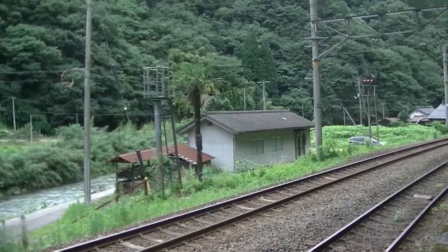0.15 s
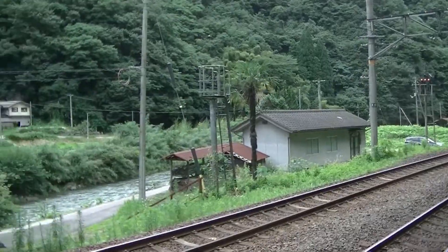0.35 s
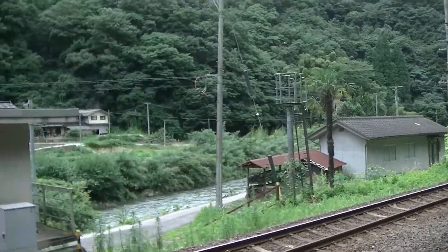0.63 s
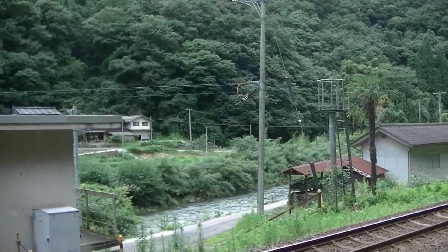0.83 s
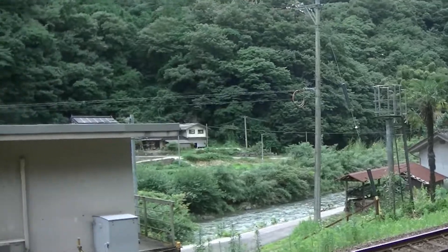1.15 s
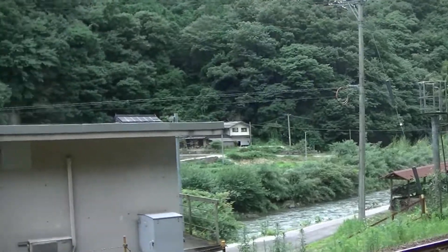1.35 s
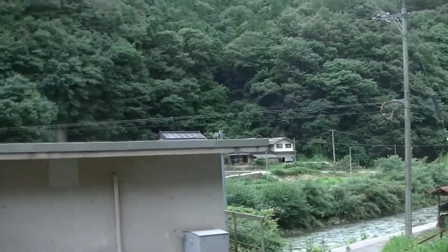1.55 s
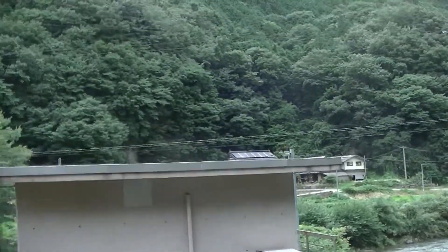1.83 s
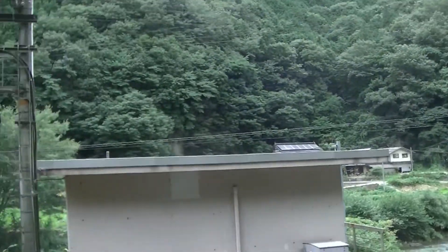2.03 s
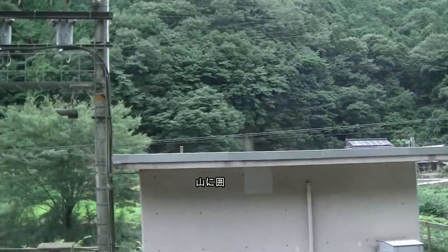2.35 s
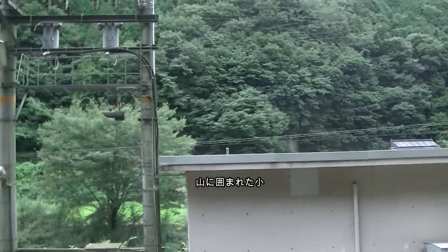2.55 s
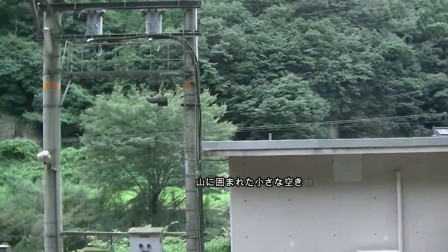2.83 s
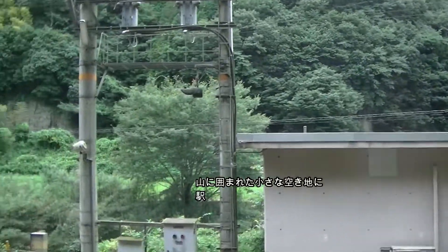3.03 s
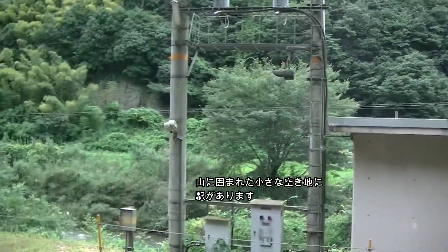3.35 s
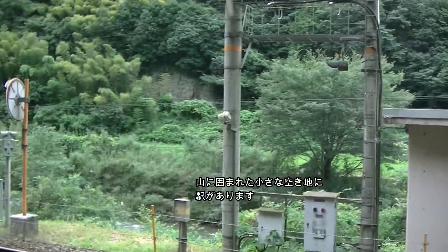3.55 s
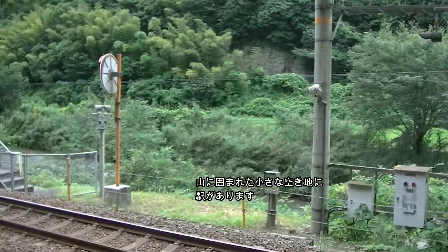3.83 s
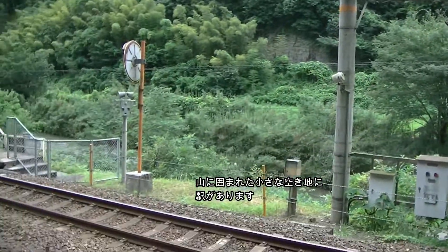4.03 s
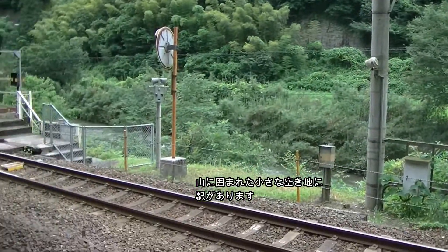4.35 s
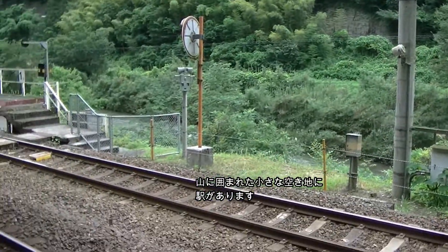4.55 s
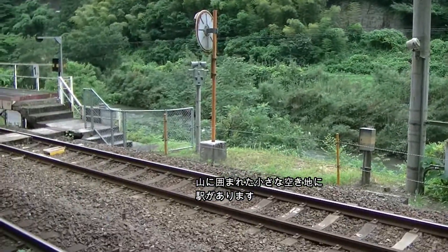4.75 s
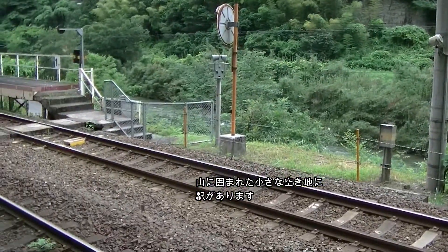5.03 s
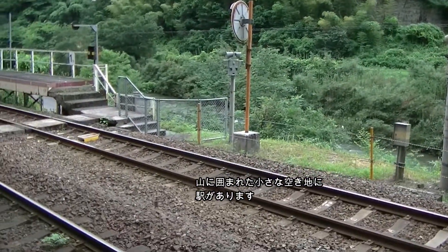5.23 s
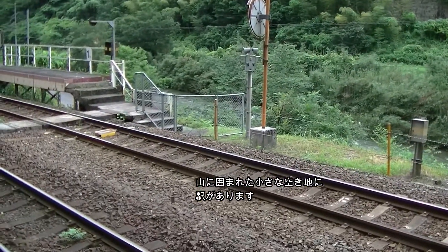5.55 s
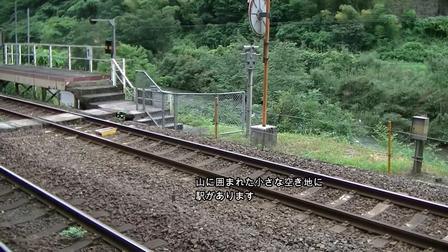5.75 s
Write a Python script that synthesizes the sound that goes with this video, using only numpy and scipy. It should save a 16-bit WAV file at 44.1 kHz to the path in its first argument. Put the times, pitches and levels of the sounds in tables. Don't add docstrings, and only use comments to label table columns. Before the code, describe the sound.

Outdoor stereo ambience in a wooded valley: river rapids roar steadily while many cicadas buzz in layered high pitches. A nearby singer starts weakly, then strokes regularly, each sizzle swelling and rising in pitch before a rattling drone; its last strokes are longer. Another close shrill voice fades, vanishes briefly and comes back louder. Insects brighten and shift slightly from one side toward centre as the camera pans.

```python
import sys
import numpy as np
from scipy import signal
from scipy.fft import rfft, irfft, next_fast_len
from scipy.io import wavfile
from scipy.ndimage import uniform_filter1d

SR = 44100
rng = np.random.default_rng(int(sys.argv[2]) if len(sys.argv) > 2 else 0)


def log_audio(samples):
    frames = np.atleast_2d(samples).T
    limited = np.clip(frames, -1, 1)
    pcm = np.round(limited * 32767).astype(np.int16)
    wavfile.write(sys.argv[1], SR, pcm)


def amplitude_ratio(level_db):
    exponent = np.asarray(level_db, float) / 20
    return 10 ** exponent


N = 259749
SIZE = next_fast_len(N)
HZ = np.arange(SIZE // 2 + 1) * SR / SIZE
LEFT_RIGHT = np.array([[1], [-1]])


def unit(x):
    return x / np.sqrt(np.mean(x ** 2))


def over_hz(table):
    hz, value = np.transpose(table)
    return np.interp(np.log(HZ + 1), np.log(hz), value)


def over_time(table):
    s, *columns = np.transpose(table)
    return [np.interp(np.arange(N) / SR, s, column) for column in columns]


def walk(rate):
    hold = int(SR / 64 / rate)
    levels = np.repeat(rng.standard_normal(100), hold)
    coarse = uniform_filter1d(uniform_filter1d(levels, hold), hold)
    return unit(np.interp(np.arange(N) / 64, np.arange(len(coarse)), coarse))


# (frequency [Hz], likeness [0-1])
COHERENCE = [(60, 0.2), (130, 0.13), (290, 0.61), (640, 0.82), (1410, 0.93), (3100, 0.67), (6820, 0.59),
             (15000, 0.05)]


def ports(own, other):
    alike = np.clip(over_hz(COHERENCE), 0, 1)
    return np.array([own, alike * own + np.sqrt(1 - alike ** 2) * other])


def snaps(rate_hz, drift, jitter, scatter_db):
    cycles = N // 80
    timing, size = rng.standard_normal((cycles, 2)).T
    phase = rng.random() + np.cumsum(rate_hz * (1 + drift * walk(3.))) / SR
    phase = phase + jitter * np.interp(phase, np.arange(cycles), timing)
    cycle = np.round(phase).astype(int)
    partials = 2 * int(16000 / rate_hz) + 1
    click = np.sinc(partials * np.float32(phase - cycle))
    return click * amplitude_ratio(scatter_db * size)[cycle % cycles]


def cicadas(body, rate_hz, count, spread=.03, drift=.006, jitter=0.0283, swell_db=-0.5, woods_t60=0.22, lag_s=0.):
    rates = rate_hz * (1 + spread * (np.arange(count) - (count - 1) / 2) / count)
    song = sum(snaps(rate, drift, jitter, scatter_db=2.0) * amplitude_ratio(swell_db * walk(6.)) for rate in rates)
    tail = np.exp(-np.log(1000) * np.arange(SR // 4) / SR / woods_t60)
    echoes = rfft(tail * rng.standard_normal((2, SR // 4)), SIZE)
    echoes = echoes / np.abs(echoes) ** .6
    echoes[1] *= np.exp(2j * np.pi * HZ * 2.3)
    ring = np.sqrt(sum((amplitude_ratio(db) / (1 + ((HZ - hz) * 2 / width) ** 2)) ** 2 for hz, width, db in body))
    later_right = np.exp(1j * np.pi * HZ * lag_s * LEFT_RIGHT)
    return unit(irfft(rfft(song, SIZE) * ring * ports(*echoes) * later_right, SIZE)[:, :N])


def slide(x, from_hz, to_hz):
    analytic = signal.hilbert(x, SIZE)[:, :N]
    return (analytic * np.exp(2j * np.pi * np.cumsum(to_hz - from_hz) / SR)).real


def crowd_gain(db, share, lift_db, turn_db, stroke):
    return amplitude_ratio(db + share * turn_db + lift_db * stroke)


# (frequency [Hz], width [Hz], level [dB])
SHRILL_RESONANCES = [(7220, 1000, -4.5), (7710, 910, -2.5), (8200, 810, -0.5), (8700, 550, -3),
                     (9050, 64, -4), (9000, 350, -14), (9480, 1200, -13)]


def shrill_crowd(turn_db, stroke):
    song = cicadas(SHRILL_RESONANCES, 452., count=3, spread=.08, drift=.002, jitter=.012,
                   swell_db=1.0, lag_s=.00002)
    return song * crowd_gain(-38, 0.63, 0.088, turn_db, stroke)


# (time [s], frequency [Hz], level [dB])
SHRILL_PATH = [
    (0, 8250, -39.5),
    (.5, 8150, -41),
    (1.5, 7980, -44),
    (2.4, 8100, -73),
    (3.05, 8220, -43.5),
    (3.8, 8350, -42),
    (4.2, 8150, -37),
    (5.0, 8220, -38.5),
    (5.6, 8200, -36.5),
    (5.89, 8200, -39),
]


def shrill_soloist():
    hz, db = over_time(SHRILL_PATH)
    body = [(7600, 300, -5.5), (8150, 400, -0.5), (8420, 490, -5.5), (9040, 220, -6.5)]
    song = cicadas(body, 446., count=1, drift=.0008, jitter=0.014, woods_t60=0.018, lag_s=.000025)
    return slide(song, 8080, hz) * amplitude_ratio(db)


# (frequency [Hz], level [dB per Hz])
RAPIDS_SPECTRUM = [(60, -27.5), (150, -20.5), (300, -11), (600, -2), (1000, -1), (1700, -3), (3000, -4.5),
                   (6000, -4.5), (10000, -16.5), (16000, -17)]


def river():
    noise = rfft(rng.standard_normal((2, SIZE)))
    surge, out = walk(0.26), 0
    water = ports(*noise) * amplitude_ratio(over_hz(RAPIDS_SPECTRUM))
    octave = np.log2(HZ + 1)
    for band in range(6, 15, 2):
        share = np.cos(np.pi / 2 * np.clip((octave - band) / 2, -1, 1)) ** 2
        out = out + irfft(water * share, SIZE)[:, :N] * amplitude_ratio(0.1 * surge + .5 * walk(7.4))
    left_minus_right_db = np.linspace(1.5, .4, N)
    fade_db = np.linspace(.25, -.25, N)
    return unit(out) * amplitude_ratio(-41.5) * amplitude_ratio(LEFT_RIGHT * left_minus_right_db / 2 + fade_db)


# (frequency [Hz], width [Hz], level [dB])
DEEP_RESONANCES = [(1830, 110, -5.5), (2028, 240, -2), (2344, 580, -0.5), (3210, 210, -1.5), (3458, 246, 4)]


def deep_crowd(turn_db, stroke):
    song = cicadas(DEEP_RESONANCES, 229., count=2, spread=.12, jitter=.02, swell_db=2.8)
    return song * crowd_gain(-44, 0.072, -1.4, turn_db, stroke)


# (frequency [Hz], width [Hz], level [dB])
FRY_RESONANCES = [(4606, 190, -1), (4747, 130, 2), (5070, 800, 2), (5870, 1200, 0.5), (6650, 320, -6.5)]


def fry_crowd(turn_db, stroke):
    song = cicadas(FRY_RESONANCES, 227., count=2, spread=.15, drift=.004, jitter=0.0098, swell_db=0.4)
    return song * crowd_gain(-44.5, 0.61, 1.66, turn_db, stroke)


# (frequency [Hz], width [Hz], level [dB])
WHIRR_RESONANCES = [(3610, 43, 2), (3860, 370, -2), (4020, 130, -3)]


def whirr_crowd(turn_db, stroke):
    song = cicadas(WHIRR_RESONANCES, 226., count=2, spread=.05, jitter=0.013, swell_db=-0.8)
    return song * crowd_gain(-51, 1.11, 0.24, turn_db, stroke)


# (time [s], frequency [Hz], level [dB])
WHIRR_PATH = [(0, 3730, -57), (.35, 3705, -50.5), (.6, 3719, -52), (1.15, 3750, -51.5), (1.88, 3650, -55),
              (1.96, 3680, -44), (2.15, 3580, -48), (2.75, 3700, -47.5), (3.1, 3600, -50), (3.7, 3760, -45),
              (4.4, 3700, -49), (5.3, 3750, -45), (5.89, 3740, -52)]


def whirr_soloist():
    hz, db = over_time(WHIRR_PATH)
    song = cicadas([(3650, 120, 0)], 228., count=1, drift=.003, jitter=0.0081)
    return slide(song, 3650, hz) * amplitude_ratio(db)


# (frequency [Hz], width [Hz], level [dB])
FAR_RESONANCES = [(11200, 2200, -5.5), (12400, 1100, 1.5), (13700, 1800, 0), (15300, 1200, -7)]


def far_sizzle(turn_db, stroke):
    song = cicadas(FAR_RESONANCES, 231., count=1, jitter=0.0623)
    return song * crowd_gain(-52, 1, .5, turn_db, stroke)


# (frequency [Hz], width [Hz], level [dB])
DRONE_RESONANCES = [(2040, 220, 5), (2230, 260, 6), (2530, 260, 2), (3340, 350, 5)]
SIZZLE_RESONANCES = [(11250, 1250, -3.5), (12500, 900, -1.5), (13600, 1200, -2.5), (14500, 1900, -6.5),
                     (15400, 900, -12)]
# (start [s], length [s], sizzle level [dB], ring [Hz], drone level in the rest after [dB])
ABDOMEN_STROKES = [
    (.04, 0.37, -50.5, 12400, -58),
    (.9, .3, -48, 12500, -48),
    (1.7, .36, -47.5, 12600, -43.5),
    (2.514, 0.36, -47.5, 12580, -44),
    (3.328, 0.37, -47.5, 12560, -44.5),
    (4.122, .44, -46.5, 12650, -45),
    (4.92, 0.52, -46.5, 12720, -51),
    (5.695, 0.55, -46, 12650, -58),
]


def singer():
    t = np.arange(N) / SR
    attack_s, release_s, rest_db, drone_lead_s = 0.077, 0.21, -16, 0.026
    start, length, sizzle_db, ring_hz, drone_db = np.transpose(ABDOMEN_STROKES)
    row = np.clip(np.searchsorted(start, t) - 1, 0, None)

    def glide(x):
        return uniform_filter1d(x, SR // 20)

    since, length = t - start[row], length[row]
    held = np.clip(since, 0, length)
    rested = np.clip(since - length, 0, None)
    stroke = np.clip(np.minimum(since / attack_s, 1 - rested / release_s), 0, 1)
    effort_db = glide(sizzle_db[row] + 3 * (held / length - .5))
    open_db = effort_db + rest_db * (1 - stroke)

    aim = np.clip(t / 1.8, 0, 1) ** 2
    off_aim_db = -4 * (1 - aim) * stroke
    linger_db = np.where(rested > 0, -7., rest_db) * (1 - stroke) - 26. * aim * rested
    ring_db = effort_db + off_aim_db - 5.5 + glide(linger_db)
    ring_hz = glide(ring_hz[row] + 250. * (held - length / 2) - 400. * rested)

    early_stroke = np.interp(t + drone_lead_s, t, stroke)
    drone_db = glide(drone_db[row] - 4 * rested) - 7 * early_stroke

    drone = cicadas(DRONE_RESONANCES, 228.3, count=1, drift=.004, jitter=0.011) * amplitude_ratio(drone_db)
    sizzle = cicadas(SIZZLE_RESONANCES, 229., count=2, drift=.003, jitter=0.0048, woods_t60=0.09) * amplitude_ratio(open_db)
    ring = cicadas([(12600, 180, 0)], 229., count=1, drift=.002, jitter=0.0084)
    ring = slide(ring, 12600, ring_hz) * amplitude_ratio(ring_db)
    strand = cicadas([(13550., 200, 0)], 229., count=1, drift=.002, jitter=.004)
    strand = slide(strand, 0, 120. * walk(3.)) * amplitude_ratio(open_db - 6. - 3 * t)
    return drone + sizzle + ring + strand, stroke


# (time [s], chorus gain [dB], chorus left minus right [dB])
CAMERA_TURN = [
    (0, -2, -1.5),
    (.5, -1.5, -1.5),
    (1.5, 0.5, -1.2),
    (2.4, 1.8, -0.5),
    (3, 3, 0.3),
    (3.7, 3.5, 0.5),
    (4.3, 3.3, 0.5),
    (5.1, 4, -0.1),
    (5.89, 5, 0.5),
]


def scene():
    turn_db, pan_db = over_time(CAMERA_TURN)
    near, stroke = singer()
    insects = near + shrill_soloist() + whirr_soloist()
    for crowd in (shrill_crowd, deep_crowd, fry_crowd, whirr_crowd, far_sizzle):
        insects = insects + crowd(turn_db, stroke)
    return insects * amplitude_ratio(LEFT_RIGHT * (pan_db - .5) / 2) + river()


def self_noise():
    rumble = signal.lfilter([1], [1, -np.exp(-2 * np.pi * 60. / SR)], rng.standard_normal((2, N)))
    return unit(rumble) * amplitude_ratio(-76 + np.linspace(-2.5, 2.5, N))


# (frequency [Hz], left minus right [dB])
PORT_BALANCE = [(60, 0), (110, 1), (200, 0.5), (380, 1.5), (700, 1), (1290, 1.5), (2380, 1.5), (4400, 1.5),
                (8120, 2), (15000, 0)]


def microphones(air):
    top_cut = np.clip((15780 - HZ) / 40, 0, 1)
    spectrum = rfft(air, SIZE) * amplitude_ratio(LEFT_RIGHT * over_hz(PORT_BALANCE) / 2)
    return irfft(spectrum * top_cut, SIZE)[:, :N]


def band_limit(x):
    return signal.sosfilt(signal.butter(12, 15950, fs=SR, output="sos"), x)


def record(dry):
    mix = microphones(dry + self_noise())
    return band_limit(mix)


dry = scene()
out = record(dry)
log_audio(out)
```